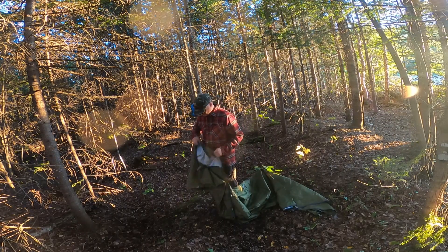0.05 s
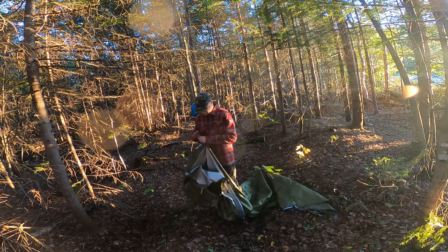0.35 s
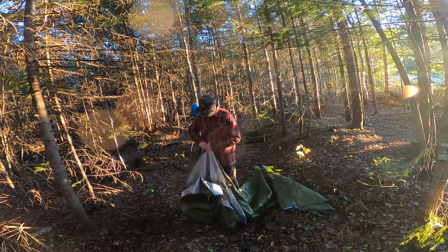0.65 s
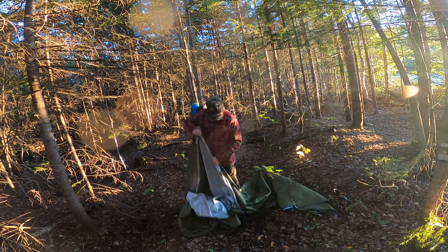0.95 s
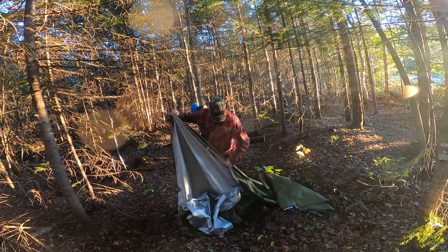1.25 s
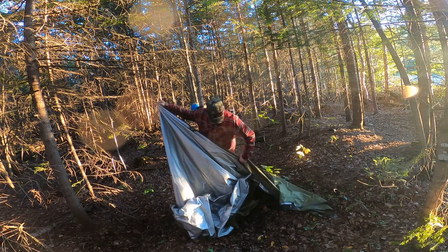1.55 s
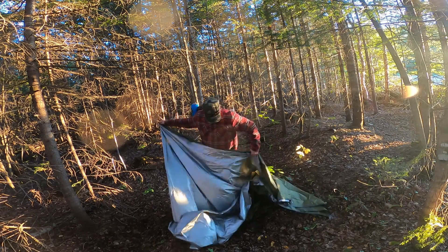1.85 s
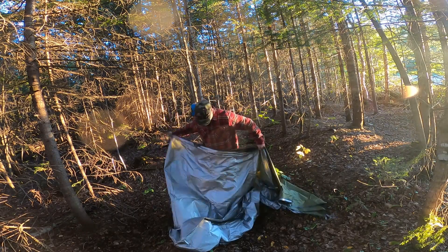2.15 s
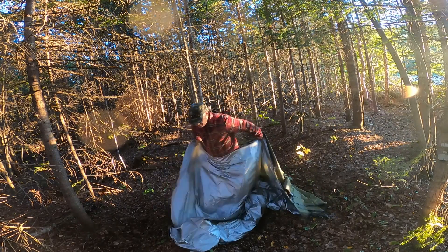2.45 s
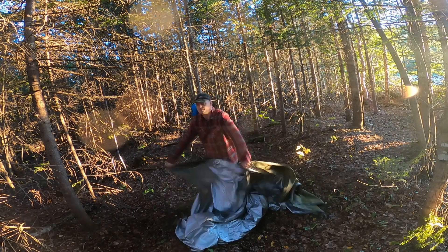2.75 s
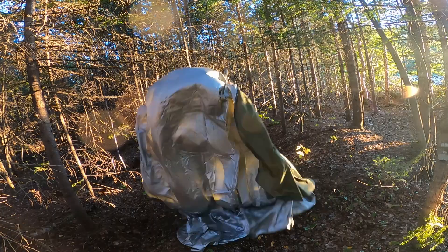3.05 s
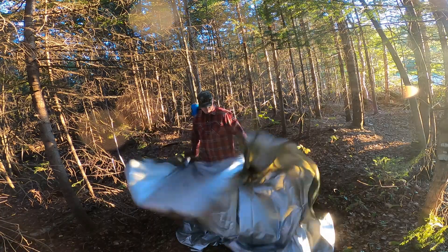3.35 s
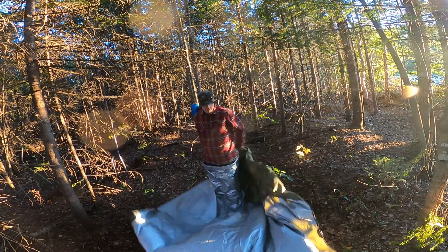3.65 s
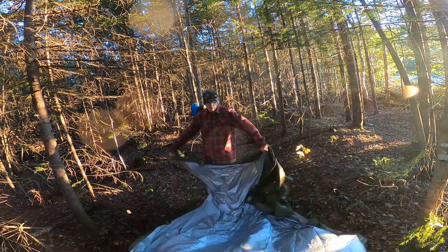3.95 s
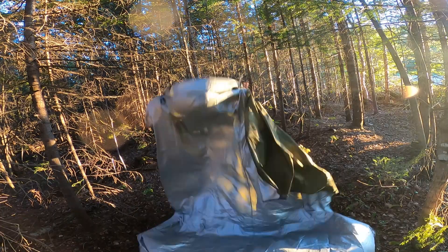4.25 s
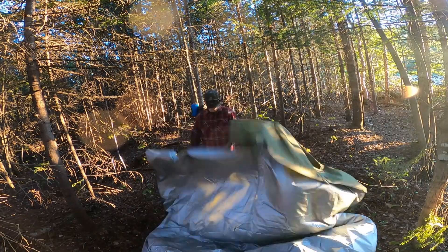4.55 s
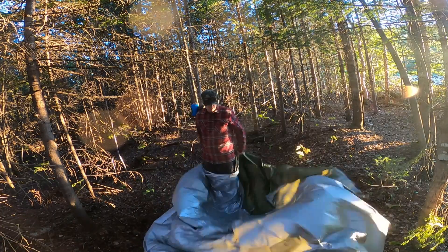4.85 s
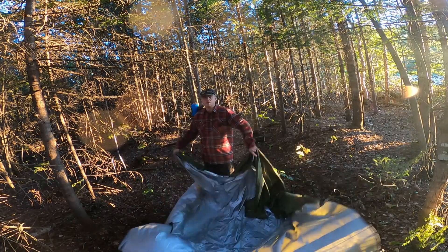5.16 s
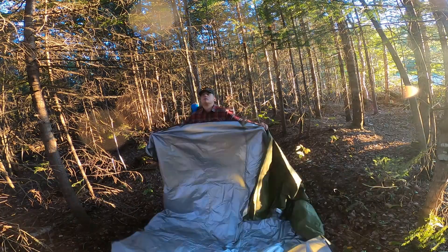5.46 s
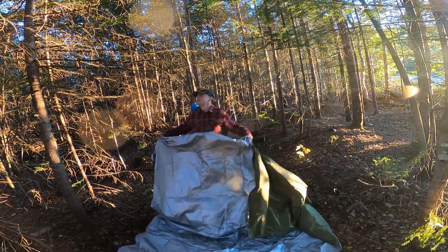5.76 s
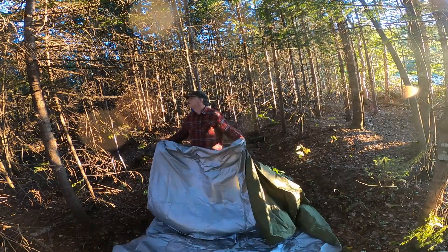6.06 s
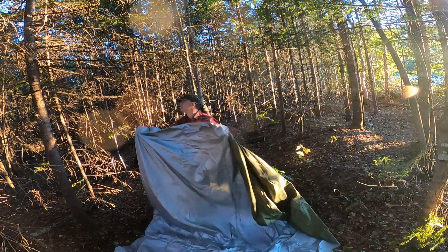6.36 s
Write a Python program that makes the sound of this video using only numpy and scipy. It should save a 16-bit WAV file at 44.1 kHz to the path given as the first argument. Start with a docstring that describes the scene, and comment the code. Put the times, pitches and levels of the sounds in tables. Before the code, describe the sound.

A fabric tarp rustles softly as it is pulled open, then flaps and cracks loudly as it is shaken out in quiet woods.

```python
"""A soft rustle over a faint hush of air: a coated fabric tarp is pulled open in a wood, some metres
from a stereo microphone. Creases buckle in swarms of tiny clicks, cloth slides on cloth, folds pop over.
Then the sheet is shaken out a few times: it flaps, thumps and cracks taut before it settles.
The ground and the trunks throw each sound back."""
import sys
import numpy as np
from scipy import signal
from scipy.fft import rfft, irfft
from scipy.io import wavfile

SR = 44100
rng = np.random.default_rng(int(sys.argv[2]) if len(sys.argv) > 2 else 0)


def inscribe(sig):
    """Save sig as 16-bit PCM at rate SR to the path in sys.argv[1].

    A 1-D sig is mono; a 2-D sig holds one channel per row.
    Samples are clipped to [-1, 1] before scaling.
    """
    pcm = np.round(np.clip(np.atleast_2d(sig).T, -1, 1) * 32767)
    wavfile.write(sys.argv[1], SR, pcm.astype(np.int16))


N = 287524
TIME = np.arange(N) / SR

# how much of the sheet swings free: t/s, share (0-1)
FREE_SHARE = [(0.4, 0.1), (1.2, 0), (2.1, 0.5), (2.6, 0.93), (5.4, 0.76), (6.2, 0.54)]
# spectrum of the air puffed out by a fold: f/Hz, level/dB
FOLD_SPECTRUM = [(30, -18), (95, -28.5), (160, 1.5), (250, 1.5), (400, 0.5), (600, -2), (800, -7),
                 (1500, -7), (4000, -64.5)]


def amp(db):
    """Decibels to gain."""
    return 10 ** (np.asarray(db) / 20)


def unit(x):
    """Scales to rms 1."""
    return x / np.sqrt(np.mean(x ** 2) + 1e-20)


def follow(points):
    """A control curve at every sample."""
    return np.interp(TIME, *np.transpose(points))


def read(points, hz):
    """Reads a table on a log-frequency axis."""
    f, value = np.transpose(points)
    return np.interp(np.log(hz + 1), np.log(f + 1), value)


def colour(x, spectrum, size=4096):
    """Causal filter with the given spectrum, so clicks keep their sharp front."""
    log_gain = np.log(amp(read(spectrum, abs(np.fft.fftfreq(size, 1 / SR)))))
    minimum_phase = np.exp(np.conj(signal.hilbert(log_gain)))
    taps = np.fft.ifft(minimum_phase).real
    return signal.oaconvolve(x, taps[:size // 2])[:N]


def wobble(rate_hz):
    """Smooth random motion of rms 1."""
    hz = np.fft.rfftfreq(N, 1 / SR)
    noise = rfft(rng.standard_normal(N))
    return unit(irfft(noise * (hz / rate_hz) * np.exp(-hz / rate_hz), N))


def swarm(per_s, spread_db, cap):
    """Random clicks of even mean power: many small, a few up to cap * spread_db louder."""
    size = amp(spread_db * np.minimum(rng.exponential(1, N), cap))
    sign = rng.choice([-1, 1], N)
    fires = rng.random(N) < per_s / SR
    return unit(size * sign * fires / np.sqrt(per_s))


def hush(level_db=-62, width=0.61):
    """Faint air in the trees, all around the microphone."""
    # spectrum of the air: f/Hz, level/dB
    spectrum = [(20, -26), (100, -26), (170, 1.5), (400, -1), (750, -23), (1300, 5.5), (3000, -17.5),
                (7000, -10), (15000, -40)]
    mid, side = (unit(colour(rng.standard_normal(N), spectrum)) for _ in range(2))
    return amp(level_db) * np.array([mid + width * side, mid - width * side])


def handling(shake_rise_s=0.067, ramp_db=20):
    """Pulls, shakes and a steady stir add up to three levels in dB: crumpling, sliding and pushed air."""
    # hands draw cloth along: full speed t/s, rise/s, hold/s, release/s, crumple/dB, slide/dB, air/dB
    pulls = [(0.03, 0.18, 0.062, .05, -56, -55.5, -81), (0.15, 0.025, .012, .03, -63, -59.5, -78),
             (0.274, .018, 0.14, 0.3, -45.5, -48, -56.5), (0.335, 0.073, 0.018, .1, -47, -49, -45),
             (0.63, .1, 0.088, 0.1, -63, -59.5, -77), (0.8, .01, 0.014, 0.027, -50.5, -56, -76),
             (0.965, 0.088, 0.11, .3, -50, -51, -60.5), (1.155, 0.4, 0.03, 0.53, -46, -46, -53.5),
             (1.36, 0.66, 0.28, 0.36, -42, -45.5, -54.5), (1.775, 0.032, 0.031, .1, -42.5, -46.5, -55),
             (1.965, 0.16, 0.036, 0.38, -44, -57, -59), (2.055, 0.15, 0.021, 0.17, -48.5, -53, -48),
             (2.86, 0.039, 0.057, 0.084, -40, -49.5, -58), (3.81, 0.062, 0.055, 0.069, -39, -46, -41),
             (3.91, 0.2, 0.27, 0.22, -40.5, -45.5, -75), (4.99, 0.15, 0.013, 0.035, -48, -48, -52),
             (5.12, 0.075, 0.032, 0.12, -39.5, -67, -42.5), (5.43, 0.12, 0.078, .12, -60, -47.5, -63.5),
             (5.61, .03, 0.021, 0.098, -52, -50.5, -59), (5.905, 0.022, 0.039, 0.051, -46, -67, -68),
             (6.02, 0.093, .055, 0.28, -48.5, -56.5, -52), (6.31, .03, 0.075, 0.078, -70, -61, -65),
             (6.48, 0.3, .04, 0.21, -41.5, -53, -47.5)]
    # the sheet flies up or sails down: full swing t/s, hold/s, release/s, crumple/dB, slide/dB, air/dB
    shakes = [(2.584, .075, 0.09, -33.5, -45, -36.5), (2.943, .11, 0.2, -25, -34, -26),
              (3.436, 0.091, 0.18, -28.5, -35, -26.5), (3.562, 0.085, 0.2, -24.5, -36.5, -23),
              (3.749, 0.021, .045, -31, -44, -28), (4.192, 0.038, 0.083, -35, -40.5, -35),
              (4.251, 0.051, 0.24, -31.5, -36.5, -36.5), (4.674, 0.031, 0.24, -26.5, -45, -25),
              (4.756, 0.1, 0.27, -26.5, -35.5, -26), (5.236, 0.12, 0.31, -35.5, -45.5, -38)]
    # the held sheet never quite rests: t/s, crumple level/dB
    stir = [(0, -62), (.22, -63.5), (.6, -60), (.86, -63.5), (1.9, -50), (2.28, -50), (2.45, -46.5),
            (2.8, -44.5), (3.35, -43.5), (4.57, -43), (5.05, -44), (5.72, -43.5), (5.87, -47.5),
            (6.25, -61)]
    stir_db = follow(stir)
    excess_db = stir_db + 50  # sliding and air grow with the stir, each at its own slope
    power = amp([stir_db, -57 + 0.4 * excess_db, -64.5 + 2.73 * excess_db]) ** 2
    moves = list(pulls) + [(at, shake_rise_s, *rest) for at, *rest in shakes]
    for at, rise, hold, release, *levels_db in moves:
        near = slice(*np.searchsorted(TIME, [at - 3 * rise, at + hold + 3 * release]))
        rising = np.maximum(at - TIME[near], 0) / rise
        dying = np.maximum(TIME[near] - at - hold, 0) / release
        # sliding and air come and go a little faster than the crumpling
        ramps = [rising + dying, rising / 0.78 + dying / 0.85, rising / 0.79 + dying / 0.92]
        for layer, top_db, ramp in zip(power, levels_db, ramps):
            layer[near] += amp(top_db - ramp_db * ramp) ** 2
    return 10 * np.log10(power)


def creases(effort_db, fewest_per_s=2600, extra_per_s=5000, clump_db=1.52, gain_db=-1.6):
    """Creases buckle in clumps; the harder the crumpling, the thicker the swarm."""
    # spectrum of a buckling crease: f/Hz, level/dB
    spectrum = [(60, -57), (130, -14), (300, -15.5), (750, -6.5), (1200, 0), (2600, -3.5), (4000, -8),
                (6000, -22.5), (9000, -32), (15000, -53)]
    per_s = fewest_per_s + extra_per_s * amp(0.5 * (effort_db - effort_db.max()))
    clicks = swarm(per_s, spread_db=3.5, cap=4) * amp(clump_db * wobble(rate_hz=30))
    return unit(colour(clicks, spectrum)) * amp(effort_db + gain_db)


def sliding(speed_db, rub_db=3, clump_db=0.5, fizz_db=-13):
    """The weave catches and slips thousands of times a second; bunched layers add a finer fizz."""
    # cloth rubbing on cloth: f/Hz, level/dB
    rub_spectrum = [(80, -34), (200, -35), (700, -20), (1100, -3), (2500, 8), (4500, 4.5), (6000, -1),
                    (7500, -7), (9000, -9), (11000, -19), (12500, -20), (15500, -44)]
    # bunched cloth wiping over itself: f/Hz, level/dB
    fizz_spectrum = [(2000, -20), (6000, -3), (9200, 4.5), (12500, -7.5), (15500, -19)]
    slips = swarm(per_s=10000, spread_db=3.5, cap=5.05) * amp(-clump_db * wobble(rate_hz=64))
    fine_slips = swarm(per_s=7000, spread_db=3, cap=5)
    bunched = np.sqrt(1 - follow(FREE_SHARE))
    rub = unit(colour(slips, rub_spectrum)) * amp(rub_db)
    fizz = unit(colour(fine_slips, fizz_spectrum)) * bunched * amp(fizz_db)
    return (rub + fizz) * amp(speed_db)


def flapping(push_db, loose_db=-52, knee_db=2.5, flap_db=-2):
    """Ripples push puffs of air: small folds when handled, deep flaps once the open sheet flies."""
    # spectrum of a deep flap: f/Hz, level/dB
    flap_spectrum = [(15, 11), (35, -25), (60, 7), (95, 3), (140, 4.5), (250, -6), (400, -9.5), (750, -3.5),
                     (1500, -8), (4000, -98.5)]
    loose = follow(FREE_SHARE) / (1.5 + np.exp((loose_db - push_db) / knee_db))
    flaps = unit(colour(swarm(per_s=420, spread_db=3, cap=2.93), flap_spectrum)) * amp(flap_db)
    folds = unit(colour(swarm(per_s=900, spread_db=3, cap=3.84), FOLD_SPECTRUM))
    return (np.sqrt(loose) * flaps + np.sqrt(1 - loose) * folds) * amp(push_db)


def snaps(gain_db=2, shiver=0.55, shiver_s=0.0016, sharpness=4.7, bounce=0.093, bounce_s=0.00141):
    """A fold pops over: one push-pull of pressure, its bounce off the ground, then a short shiver."""
    # folds that pop over: t/s, relative level/dB, nominal pitch f/Hz
    pops = [(0.244, -36, 1340), (0.414, -27, 1510), (0.47, -32, 2620), (0.635, -37, 1600),
            (0.747, -39.5, 1740), (0.7512, -34.5, 1700), (0.788, -37.5, 1500), (1.183, -27.5, 1600),
            (1.507, -22, 1600), (1.538, -35.5, 2680), (1.7687, -30, 2500), (1.963, -30.5, 1680),
            (2.067, -23.5, 1730), (2.37, -27.5, 1600), (2.4323, -28.5, 2200), (2.6866, -20.5, 940),
            (3.447, -13, 1000), (3.472, -18, 972), (3.487, -9.5, 950), (3.523, -10, 1100),
            (3.5779, -10, 2200), (3.633, -19, 1200), (3.655, -34, 1170), (3.736, -11, 960),
            (3.776, -21, 950), (4.135, -23.5, 2200), (4.662, -17.5, 1410), (4.6772, -12, 990),
            (5.277, -17, 2160), (5.428, -24, 2540), (5.4655, -14, 1190), (5.504, -28, 1110),
            (6.021, -31, 2500), (6.051, -31, 2800), (6.291, -34, 2830)]
    # colour of a pop: f/Hz, level/dB
    spectrum = [(40, -54), (200, -8), (700, -6.5), (1200, 0.5), (3000, 5.5), (6000, 0.5), (10000, -28),
                (15500, -13)]
    out, t = np.zeros(N), np.arange(2048) / SR
    t_pop = t - 0.0012
    fade = np.exp(-t / shiver_s)
    for at, level_db, hz in pops:
        u = sharpness * hz * np.maximum([t_pop, t_pop - bounce_s], 0)
        direct, ground = u * (1 - u / 2) * np.exp(-u)
        pulse = (direct + bounce * ground) / direct.max()
        tremble = signal.fftconvolve(rng.standard_normal(len(t)), direct)[:len(t)]
        tail = unit(tremble * fade) * np.sqrt(np.mean(fade ** 2))
        pop = shiver * tail - (1 - shiver) * pulse
        out[round(at * SR):][:len(t)] += amp(level_db + gain_db) * pop
    return colour(out, spectrum)


def thumps(swing_s=0.0016):
    """Slack cloth pushes the air once out and back: a soft, hollow pat."""
    # the cloth drops or bellies out: t/s, relative level/dB
    pats = [(0.353, -41), (0.619, -48), (0.75, -56), (2.633, -23.5), (2.961, -17), (2.997, -17),
            (3.574, -18.5), (3.606, -21), (3.652, -21.5), (3.744, -16), (4.203, -18.5), (4.293, -22),
            (4.813, -17), (5.796, -33), (5.945, -42)]
    out, u = np.zeros(N), np.arange(2048) / SR / swing_s
    pulse = u * (1 - u + u ** 2 / 6) * np.exp(-u)
    for at, level_db in pats:
        out[round(at * SR):][:len(u)] += amp(level_db) * pulse / pulse.max()
    return colour(out, FOLD_SPECTRUM)


def cracks(needle_s=0.00012, puff_s=0.0034, puff_gain=0.5, gain_db=-2):
    """The edge stops dead: a needle of pressure, followed by a soft puff of air."""
    # the flying edge whips taut: t/s, relative level/dB
    whips = [(3.0093, -5), (3.1344, -8.5), (4.6857, -12)]
    out, t = np.zeros(N), np.arange(1024) / SR
    u, v = t / needle_s, t / puff_s
    needle = u ** 3 * (1 - u / 2) * np.exp(-2 * u)
    puff = (1 - v) * np.exp(-v) * (1 - np.exp(-u))
    pulse = needle / needle.max() + puff_gain * puff
    for at, level_db in whips:
        out[round(at * SR):][:len(t)] -= amp(level_db + gain_db) * pulse
    return out


def echo(x, decay, share, stretch=1):
    """Scattered sound dying band by band; the sheet keeps moving, so its phases never repeat."""
    hop = 64
    frames = dict(fs=SR, nperseg=4 * hop, noverlap=3 * hop)
    hz, _, bands = signal.stft(x, **frames)
    t60_s = stretch * read(decay, hz)
    carry = amp(-60 * hop / SR / t60_s) ** 2  # share of the power left after one hop
    power = np.array([signal.lfilter([0, 0, 1 - k], [1, -k], band)
                      for k, band in zip(carry, abs(bands) ** 2)])
    noise = signal.stft(rng.standard_normal(N), **frames)[2]
    scattered = noise / noise.std() * np.sqrt(power) * amp(read(share, hz))[:, None]
    return signal.istft(scattered, **frames)[1][:N]


def wood(x, far_db=-8):
    """Trunks echo alike to left and right; leaf litter and twigs scatter treble differently to each."""
    # decay of the wood's echo: f/Hz, t60/s
    decay = [(60, 0.15), (500, 0.26), (1500, 0.26), (4000, 0.8), (12000, 0.63)]
    # return from the trunks against the direct sound: f/Hz, level/dB
    trunks = [(30, -42), (170, -21), (600, -10.5), (3000, -18.5)]
    # scatter from the litter against the direct sound: f/Hz, level/dB
    litter = [(30, -33), (300, -12), (1000, -9.5), (3000, -6.5), (7000, -2), (14000, 6.5)]
    centre = x + echo(x, decay, trunks)
    channels = []
    for _ in range(2):
        near = echo(x, decay, litter, stretch=0.042)
        far = echo(x, decay, litter, stretch=0.93)
        channels.append(centre + near + amp(far_db) * far)
    return np.array(channels)


def scene(flutter_db=1.2):
    """The tarp, some metres off in the wood; the more of it swings free, the more its air gulps."""
    crumple_db, slide_db, air_db = handling()
    gulps_db = flutter_db * follow(FREE_SHARE) * wobble(rate_hz=16)
    cloth = creases(crumple_db) + sliding(slide_db) + flapping(air_db + gulps_db)
    return wood(cloth + thumps() + snaps() + cracks()) + hush()


def record(dry, lag_ms=0.032, cutoff_hz=15700):
    """Two close microphone ports, the left a little later and differently coloured; then a low-pass."""
    # balance of the ports: f/Hz, left minus right level/dB
    balance = [(60, 0), (110, 2), (200, 0.5), (380, 0.5), (700, -1), (1290, -0.5), (2380, 1.5), (4400, 1),
               (8120, -0.5), (15000, -6.5)]
    hz = np.fft.rfftfreq(2 * N, 1 / SR)
    tilt = amp(read(balance, hz) / 2)
    delay = np.exp(-2j * np.pi * hz * lag_ms / 1000)
    ports = irfft(rfft(dry, 2 * N) * np.array([tilt * delay, 1 / tilt]))[:, :N]
    lowpass = signal.firwin(511, cutoff_hz, window=("kaiser", 9), fs=SR)
    return signal.oaconvolve(ports, lowpass[None], "same")


dry = scene()
out = record(dry)
inscribe(out)
```